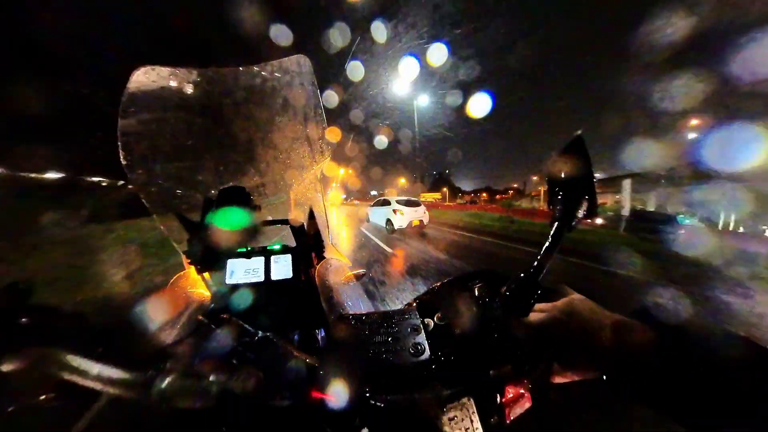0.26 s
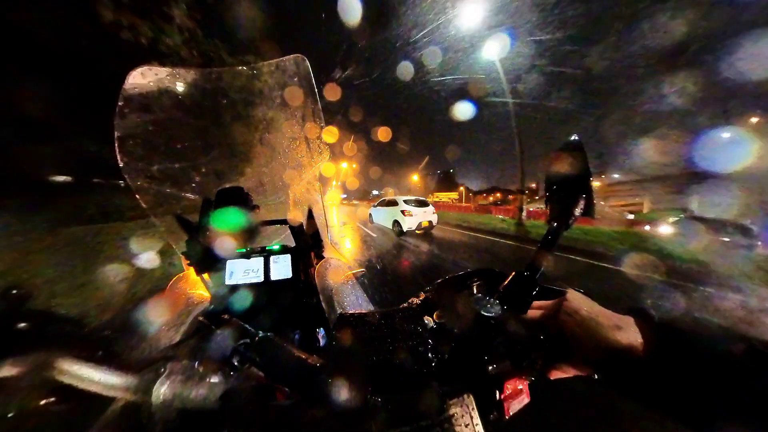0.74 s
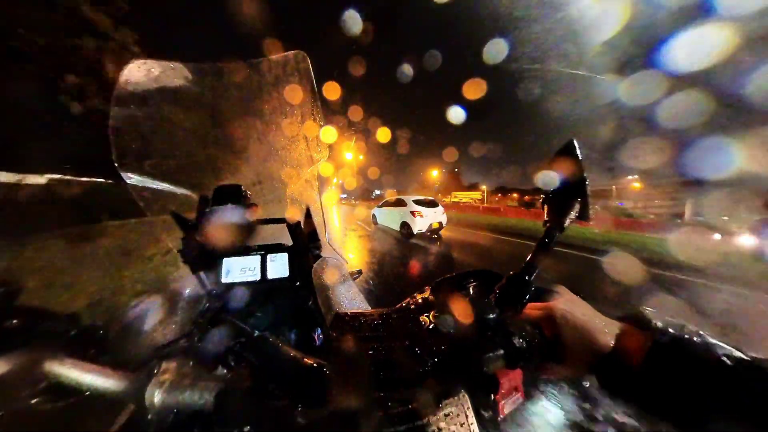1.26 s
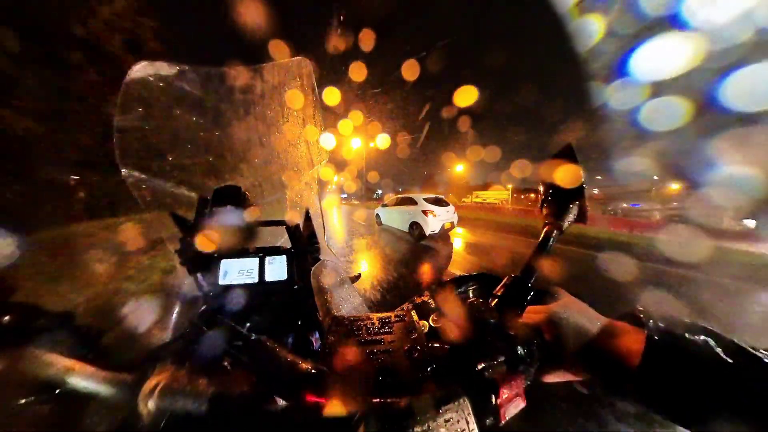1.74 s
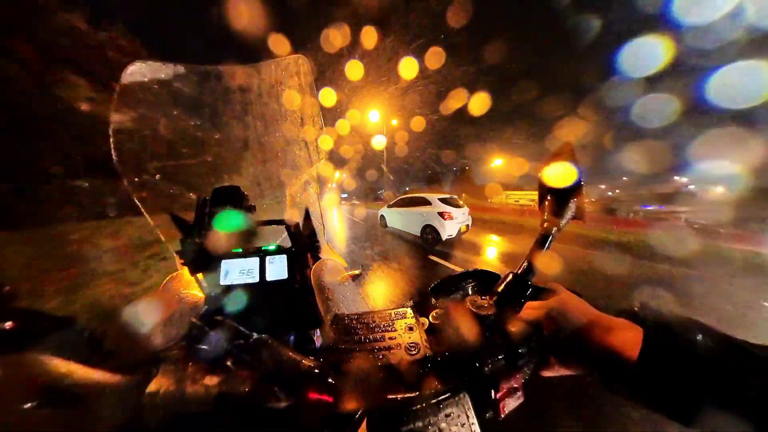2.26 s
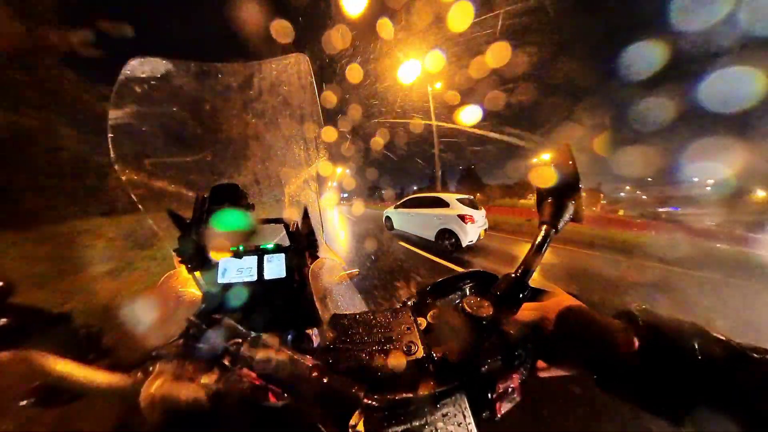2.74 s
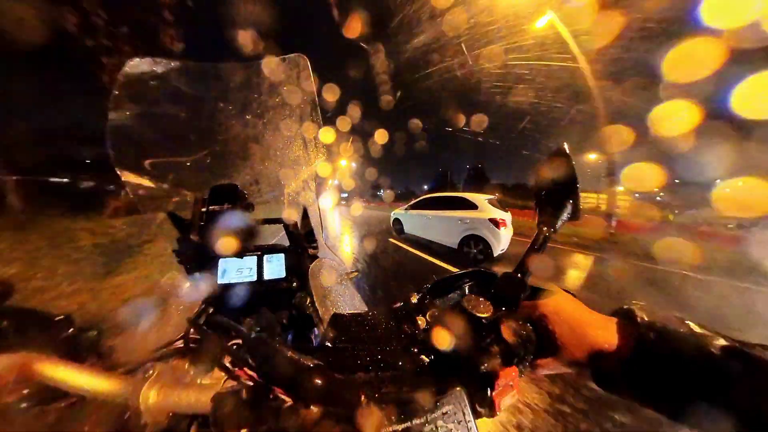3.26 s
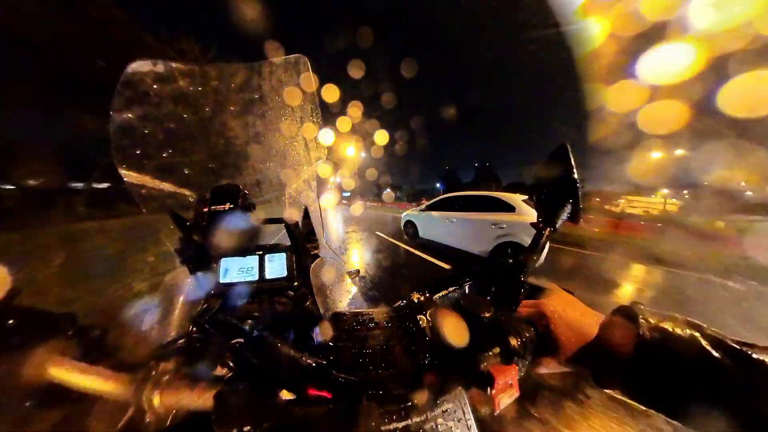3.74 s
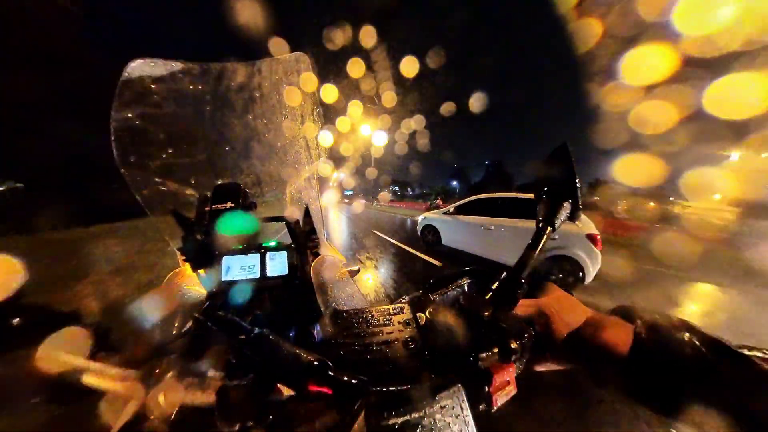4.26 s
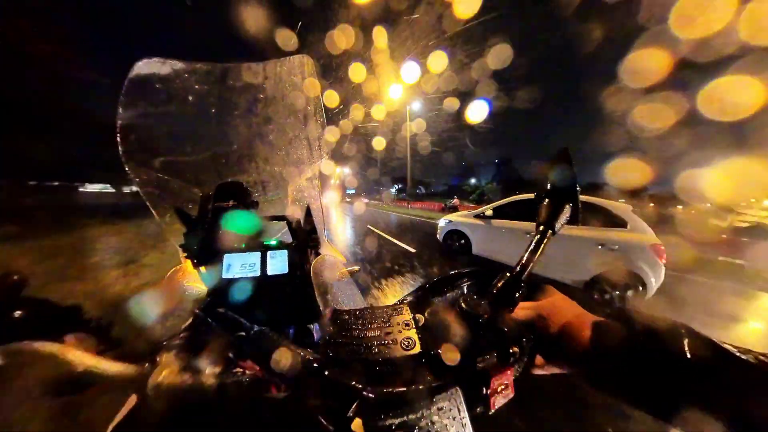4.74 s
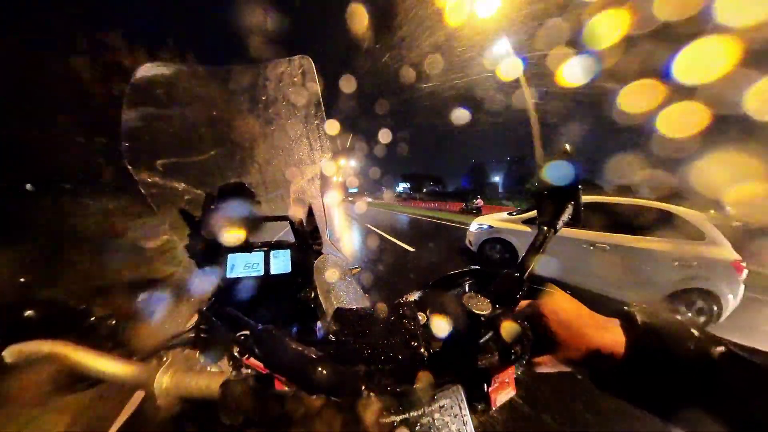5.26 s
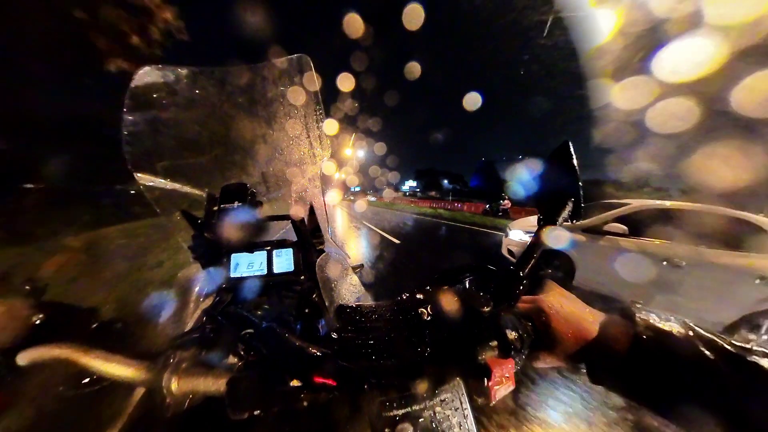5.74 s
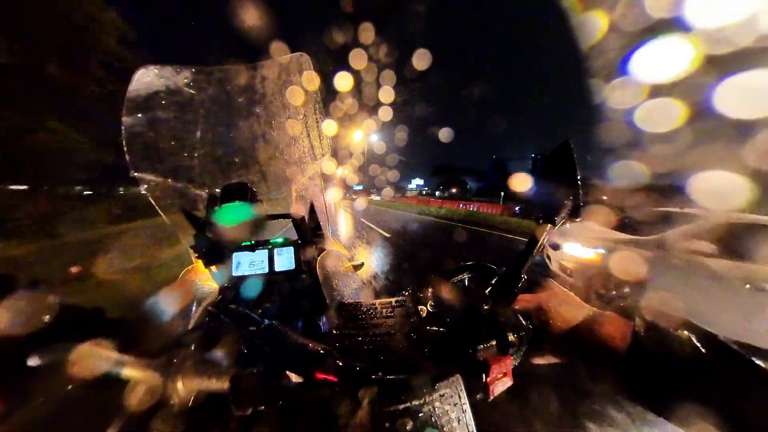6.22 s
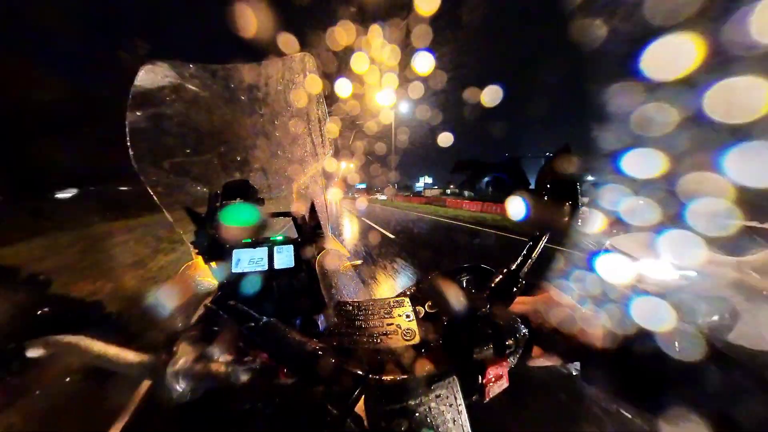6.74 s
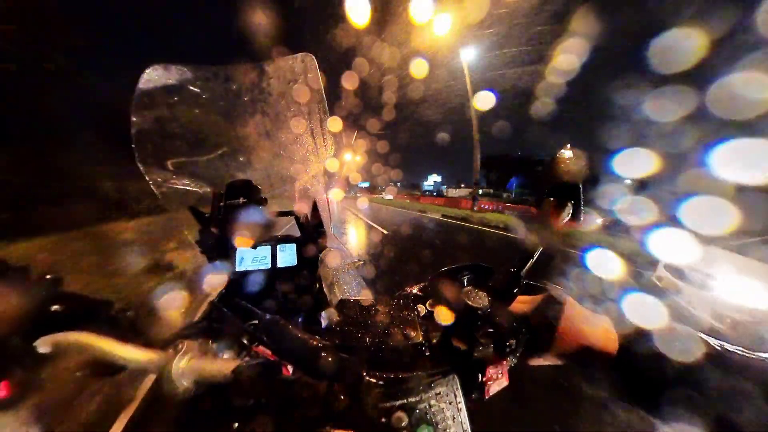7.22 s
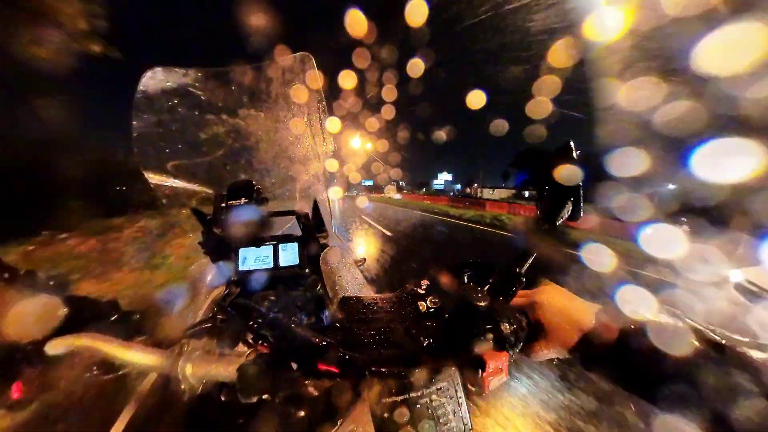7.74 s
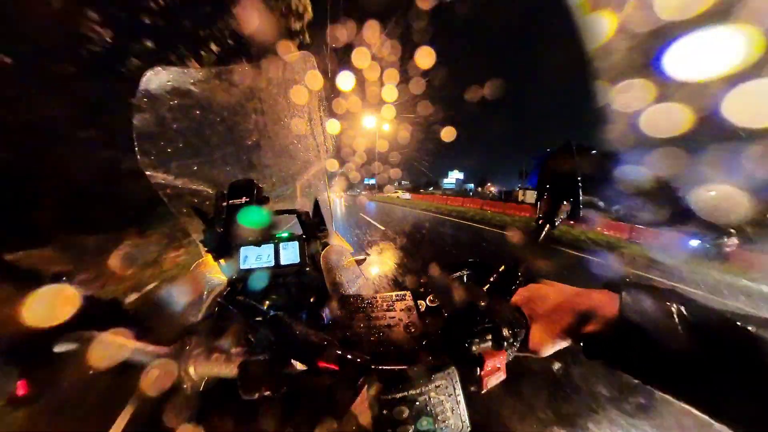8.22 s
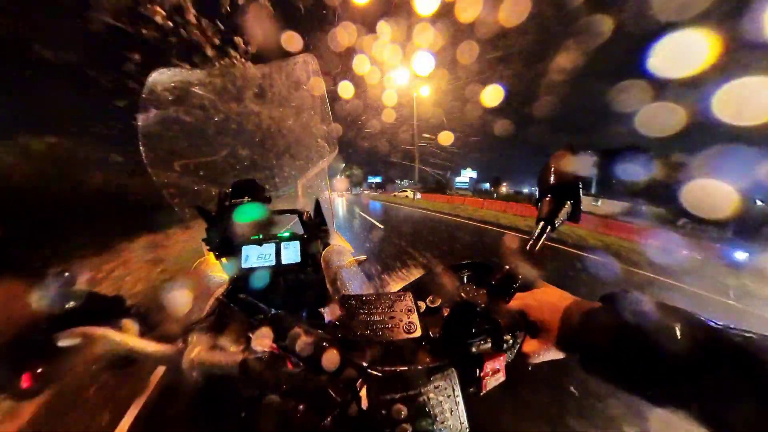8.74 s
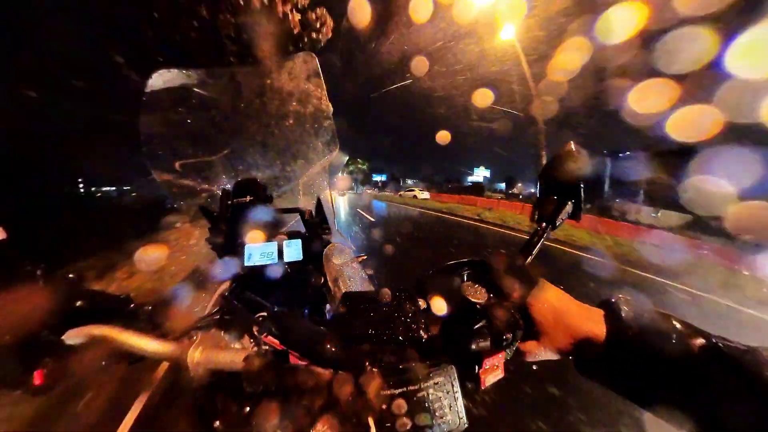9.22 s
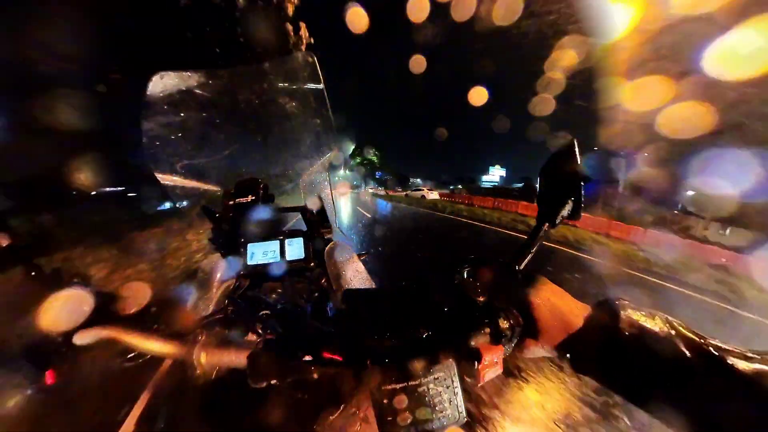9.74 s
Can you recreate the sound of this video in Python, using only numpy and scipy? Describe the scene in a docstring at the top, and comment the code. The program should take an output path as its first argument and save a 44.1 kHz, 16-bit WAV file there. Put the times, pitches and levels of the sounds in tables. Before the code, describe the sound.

Close on a moving motorcycle in heavy rain, an uneven twin-cylinder exhaust throbs under low wind buffeting and wide stereo hiss of spray. The throttle opens after a second and pitch climbs slowly. Dull knocks and wet squelches appear past four seconds. Just after six, the sound switches to muffled mono: boom, ringing clatter and ticking drops, then the throttle closes and the engine slows.

```python
"""A twin-cylinder motorcycle on a wet road in heavy rain, heard by a camera on its rider. First come the
throbbing exhaust (a stack of engine harmonics), buffeting wind and hissing rain (shaped noise). The throttle
opens after one second and the engine gathers speed; past four seconds the mount knocks and the tyre squelches.
After six seconds the camera switches from open stereo ports to one sheltered port: the hiss goes, clatter
and gear whine ring in its hollow and drops tick on the case. Last, the throttle rolls off and the engine slows."""
import sys
import numpy as np
from scipy import signal
from scipy.fft import rfft, irfft
from scipy.io import wavfile
from scipy.ndimage import uniform_filter1d, minimum_filter1d

SR = 44100
rng = np.random.default_rng(int(sys.argv[2]) if len(sys.argv) > 2 else 0)


def int16_out(signal):
    """Quantize to a 16-bit WAV file."""
    q = np.round(np.clip(np.atleast_2d(signal).T, -1, 1) * 32767)
    wavfile.write(sys.argv[1], SR, q.astype(np.int16))


N = 440118
T = np.arange(N) / SR  # time of every sample [s]
FREQ = np.maximum(np.arange(N // 2 + 1) * SR / N, 1)  # frequency of every spectrum bin [Hz]
MID_SPEED = 20.5  # reference engine speed [four-stroke cycles per second]


def undb(db):
    """Turn decibels into a gain."""
    return 10 ** (np.asarray(db) / 20)


def curve(table, axis=1):
    """Read one column of a time table at every sample."""
    table = np.array(table)
    return np.interp(T, table[:, 0], table[:, axis])


def bumps(table):
    """Smooth brief changes of level [dB]."""
    return sum(db * np.exp(-((T - s) / length) ** 2) for s, length, db in table)


def unit(x):
    """Scale to rms 1."""
    return x / np.sqrt(np.mean(x ** 2))


def noise():
    """White noise."""
    return rng.standard_normal(N)


def walk(rate):
    """Smooth random wandering, spread near 1, with rate new values per second."""
    knots = np.arange(0, T[-1] + 1, 1 / rate)
    return np.interp(T, knots, rng.standard_normal(len(knots)))


def colour(x, spectrum, modes=()):
    """Give white noise of rms 1 a spectrum in dB per Hz, with resonances on top."""
    hz, db = np.transpose(spectrum)
    gain = undb(np.interp(np.log(FREQ), np.log(hz), db)) * np.sqrt(SR / 2)
    for centre, width, boost in modes:
        peak = 1 / (1 + (2 * (FREQ - centre) / width) ** 2)
        gain = gain * (1 + (undb(boost) - 1) * peak)
    return irfft(rfft(x) * gain, N)


def ports(make, likeness, pan_db):
    """Left and right signals that share a part of their sound; pan_db is left minus right."""
    share = np.clip(likeness, 0, 1)
    common = np.sqrt(share) * make()
    separate = np.sqrt(1 - share) * np.array([make(), make()])
    sides = undb(np.array([[pan_db], [-pan_db]]) / 2)
    return unit((common + separate) * sides)


def left_late(pair, lag_s):
    """Sound from the right reaches the left port later."""
    return np.array([np.interp(T - lag_s, T, pair[0]), pair[1]])


def by_speed(speed, mid_db, slope_db):
    """Gain that follows engine speed: level at MID_SPEED, and dB more per extra cycle per second."""
    return undb(mid_db + slope_db * (speed - MID_SPEED))


def by_throttle(throttle, levels_db):
    """Gain that moves between three levels: overrun (engine braking), cruising and pulling."""
    return undb(np.interp(throttle, [-1, 0, 1], levels_db))


def harmonic(turns, db):
    """One exhaust harmonic, a sine whose level wavers slightly."""
    return np.sqrt(2) * undb(db + .7 * walk(9)) * np.sin(2 * np.pi * turns)


def boom_line(cycle, order, db, lag, smear):
    """One low exhaust harmonic; higher orders arrive later, which spreads the thump over the cycle."""
    # lag: delay in cycles; smear: further delay for each order in cycles
    return harmonic(order * (cycle - lag) - smear * order ** 2 / 2, db)


def growl_lines(cycle, speed, spectrum, level_db, tilt_db=0):
    """Upper harmonics: uneven firings add or cancel, and pipe echoes scatter their timing."""
    second_firing = 270 / 720  # the second cylinder fires 270 crank degrees after the first
    second_gain = undb(-0.5)  # and a little weaker
    orders = np.arange(13, 30)
    pair = abs(1 + second_gain * np.exp(-2j * np.pi * orders * second_firing)) / 2
    lines = []
    for order, both, lag in zip(orders, pair, rng.random(len(orders))):
        db = np.interp(order * speed, *np.transpose(spectrum)) + level_db
        db = db + tilt_db * np.log2(order / orders[0])  # dB per octave above the lowest
        lines.append((order, both * harmonic(order * cycle - lag, db)))
    return lines


def open_exhaust(cycle, speed, throttle):
    """Boom follows the throttle and fades in the silencer's dips; growl grows with speed and throttle."""
    # boom before the silencer: (order of the cycle, cruising [dB], pulling [dB])
    boom_orders = [(2, -30.5, -29.5), (3, -24.5, -23.5), (4, -16.5, -21.5), (5, -17.5, -15.5),
                   (6, -17.5, -15), (7, -20, -28.5), (8, -39, -43), (9, -23.5, -29), (10, -38.5, -19.5),
                   (11, -29, -18)]
    # dips of the silencer: (frequency [Hz], width [Hz], level [dB])
    silencer = [(136.1, 12.8, -15), (242, 6.2, -7.5)]
    # growl where both firings add up, at MID_SPEED before its gain: (frequency [Hz], one harmonic [dB])
    growl = [(255, -29), (285, -27.5), (305, -27.5), (325, -25.5), (355, -23.5), (385, -24.5), (445, -29.5),
             (480, -37), (515, -35), (640, -45)]
    # balance of the exhaust: (frequency [Hz], left minus right [dB])
    exhaust_pan = [(55, 0.5), (80, -13.5), (102, 3), (180, 2.5), (205, -7.5), (320, 4), (560, 9)]
    # brief dips under the strongest gust: (time [s], half length [s], level [dB])
    exhaust_dips = [(6.15, .06, -4)]

    axis_hz = np.arange(800.)
    response_db = sum(db * np.exp(-((axis_hz - hz) / width) ** 2) for hz, width, db in silencer)
    boom_gain = by_speed(speed, mid_db=0.71, slope_db=-0.66)
    lines = []
    for order, cruise_db, pull_db in boom_orders:
        db = cruise_db + (pull_db - cruise_db) * throttle
        db = db + np.interp(order * speed, axis_hz, response_db)
        lines.append((order, boom_gain * boom_line(cycle, order, db, lag=.8, smear=.125)))

    growl_db = -0.71 + 0.38 * (speed - MID_SPEED)
    tilt_db = -3.5 * (1 - np.clip(throttle, 0, 1))  # duller off the throttle
    lines += growl_lines(cycle, speed, growl, growl_db, tilt_db)

    out = np.zeros((2, N))
    for order, line in lines:
        pan_db = np.interp(order * speed.mean(), *np.transpose(exhaust_pan))
        sides = undb(pan_db * np.array([[.5], [-.5]]))
        out += sides / sides.mean() * line
    return left_late(out, lag_s=0.00026) * undb(bumps(exhaust_dips))


def clatter(cycle, repeat, once, twice, flutter_db, size=2048):
    """Valve and piston noise: part repeats every cycle, and it swells with each cycle and crank turn."""
    share = np.clip(repeat, 0, 1)
    pattern = np.interp(cycle % 1 * size, np.arange(size), rng.standard_normal(size))
    beat = 1 + once * np.cos(2 * np.pi * cycle) + twice * np.cos(4 * np.pi * cycle)
    mix = np.sqrt(share) * pattern + np.sqrt(1 - share) * noise()
    return unit(mix * beat * undb(flutter_db * walk(22)))


def open_clatter(cycle):
    """Engine clatter at the open ports, nearly alike on both sides, with a slowly changing level."""
    # spectrum before the swell: (frequency [Hz], level [dB per Hz])
    clatter_spectrum = [(300, -51), (560, -56), (690, -64), (860, -57), (970, -63), (1080, -56.5),
                        (1280, -77.5), (2500, -96), (6000, -118.5)]
    # slow change of level: (time [s], level [dB])
    clatter_swell = [(0, 4), (.5, 0.5), (1.3, -2.5), (2.3, 1.5), (5.2, -2), (6.2, 1.5)]

    def one_side():
        return clatter(cycle, repeat=0.25, once=0.18, twice=0.099, flutter_db=2.0)

    pair = ports(one_side, likeness=0.87, pan_db=3.5)
    return colour(pair, clatter_spectrum) * undb(curve(clatter_swell))


def gear_whine(cycle, number):
    """One harmonic of the tooth mesh, rms near 1; uneven crank speed gives it faint sidebands."""
    mesh_order = 27.26  # gear teeth that mesh in one engine cycle
    mesh = 2 * np.pi * number * mesh_order * cycle
    mesh = mesh + 0.25 * np.sin(2 * np.pi * cycle) + 0.13 * walk(25)
    return np.sqrt(2) * undb(1.1 * walk(25)) * np.sin(mesh)


def chain_hum(cycle):
    """The drive chain hums as its links meet the sprocket, rms near 1."""
    chain_order = 14.27  # chain links met in one engine cycle
    return np.sqrt(2) * undb(2.0 * walk(16)) * np.sin(2 * np.pi * chain_order * cycle)


def open_wind(speed):
    """Wind buffets the open ports: low noise with random flutter, gusts, and more level with speed."""
    # spectrum at MID_SPEED before its gain and gusts: (frequency [Hz], level [dB per Hz])
    wind_spectrum = [(15, -70), (26, -50), (35, -40), (58, -36), (105, -38), (155, -43.5), (212, -39.5),
                     (270, -46.5), (390, -49.5), (570, -55), (700, -59), (1100, -62), (1400, -72),
                     (2500, -92)]
    # gusts: (time [s], half length [s], level [dB])
    gusts = [(1.42, .14, 4.5), (3.1, .1, 3), (4.42, .07, 4.5), (6.16, 0.076, 6)]
    buffeting = unit(undb(2.3 * walk(18) + 0.64 * walk(2.7)))
    wind = colour(ports(noise, likeness=0.11, pan_db=1.5) * buffeting, wind_spectrum)
    return wind * by_speed(speed, mid_db=-0.12, slope_db=0.22) * undb(bumps(gusts))


def howl():
    """Wind sounds one low, unsteady note in a hollow near the camera, rms 1."""
    turn = 2 * np.pi * 213.1 * T  # pitch in Hz
    return unit(walk(6) * np.cos(turn) + walk(6) * np.sin(turn))


def patter(rate, spread_db):
    """Impacts of drops: many small, a few large."""
    hits = rng.random(N) < rate / SR
    size_db = spread_db * np.minimum(rng.exponential(size=N), 5)
    return unit(hits * np.sign(noise()) * undb(size_db))


def spurts(rate, decay_s, spread_db):
    """Envelope of overlapping splashes, each sudden and then dying away, rms 1."""
    fade = np.exp(-1 / (decay_s * SR))
    power = signal.lfilter([1], [1, -fade], patter(rate, spread_db) ** 2)
    return unit(np.sqrt(power + 1e-12))


def rain(cycle, speed):
    """Tyre spray hisses and throbs slightly at the engine's beat; drops splash on screen and helmet."""
    # spectrum before the level changes: (frequency [Hz], level [dB per Hz])
    rain_spectrum = [(500, -74.5), (1000, -69), (1800, -67), (2500, -68), (4000, -72), (5800, -72.5),
                     (7000, -78), (8000, -93), (8800, -105)]
    # the spray moves to the right as a car is overtaken: (time [s], lag of the left port [s])
    spray_lag = [(2, .000075), (3.5, .000136)]
    # surges of spray: (time [s], half length [s], level [dB])
    spray_surges = [(.1, 0.29, 1.5), (.74, 0.056, 1.5), (1.95, 0.2, 1.1), (2.26, .03, 2), (2.95, 0.2, 1.2),
                    (4.497, 0.0087, 4), (5.6, 0.2, 0.7), (5.95, 0.12, 1)]
    # brief dips of the hiss: (time [s], half length [s], level [dB])
    hiss_dips = [(1.16, 0.073, -3), (1.5, 0.064, -2.5), (2.34, 0.03, -4.5), (4.37, 0.054, -2.5),
                 (5.01, 0.054, -3.5), (5.15, .035, -7), (5.29, .03, -6), (6.12, .04, -4.5)]

    spray = left_late(ports(noise, likeness=.3, pan_db=4.5), lag_s=curve(spray_lag))
    spray = spray * undb(1.0 * walk(170))  # fine grain

    def splashes():
        return noise() * spurts(rate=700, decay_s=.001, spread_db=2.5)

    drops = ports(splashes, likeness=0.11, pan_db=2.5)
    throb_db = .5 * np.cos(2 * np.pi * cycle)
    flutter_db = throb_db + 0.2 * walk(45) + 0.75 * walk(15)
    surge = undb(flutter_db + bumps(spray_surges) + bumps(hiss_dips))
    level = by_speed(speed, mid_db=0.47, slope_db=-0.78)
    return colour(unit(spray + undb(-3.5) * drops), rain_spectrum) * surge * level


def knocks():
    """Bumps and buffets of wind jolt the camera mount: a sudden dull knock that dies quickly."""
    # knocks: (time [s], decay [s], rms level at the start [dB])
    jolts = [(4.155, 0.005, -17), (4.372, .007, -18), (4.402, .016, -18), (5.363, .005, -16),
             (6.115, .008, -20), (6.139, .012, -13), (6.181, .012, -15), (8.459, .014, -19)]
    # tone of a knock, scaled to rms 1 below: (frequency [Hz], relative level [dB per Hz])
    knock_spectrum = [(150, -8), (420, 1.5), (620, -0.5), (900, -6.5), (1500, -28), (3000, -60),
                      (6000, -84)]
    envelope = sum(undb(db) * (T >= s) * np.exp(-abs(T - s) / decay) for s, decay, db in jolts)
    shake = ports(noise, likeness=0.69, pan_db=1)
    return colour(envelope * shake, knock_spectrum) / np.std(colour(shake, knock_spectrum))


def squelches():
    """Water squeezed from under the tyre: short, rough, falling chirps."""
    # squelches: (time [s], length [s], starting pitch [Hz], peak before roughening [dB])
    chirps = [(4.412, .028, 1170, -22), (4.462, .034, 1250, -26), (5.992, .024, 1130, -26)]
    pitch_fall = .52  # final pitch over starting pitch
    out = np.zeros(N)
    for s, length, hz, db in chirps:
        along = np.clip((T - s) / length, 0, 1)
        swell = np.sqrt(np.sin(np.pi * along).clip(0))
        turns = np.cumsum(hz * pitch_fall ** along) / SR
        out += undb(db) * swell * np.sin(2 * np.pi * turns)
    return out * undb(2.5 * walk(400))  # rough level


def open_ports(cycle, speed, throttle):
    """Exhaust, clatter, gears, chain, wind, rain, knocks and squelches in stereo."""
    whine = gear_whine(cycle, number=1) * by_speed(speed, mid_db=-37, slope_db=2)
    chain = chain_hum(cycle) * by_speed(speed, mid_db=-34.5, slope_db=.5)
    bike = open_exhaust(cycle, speed, throttle) + open_clatter(cycle) + whine + chain
    air = open_wind(speed) + undb(-30.5) * howl()
    water = rain(cycle, speed) + squelches()
    return left_late(bike, lag_s=0.000087) + air + water + knocks()


def sheltered_exhaust(cycle, speed, throttle):
    """A duller boom that changes with the throttle; the growl dies down as the throttle closes."""
    # boom before the swell and gain: (order of the cycle, overrun [dB], cruising [dB], pulling [dB])
    boom_orders = [(2, -29, -31, -31), (3, -19.5, -14.5, -20), (4, -13.5, -25, -23.5), (5, -30, -35, -24.5),
                   (6, -23.5, -24, -27.5), (7, -31, -33, -24), (8, -32, -30, -29), (9, -31, -13.5, -18.5),
                   (10, -20, -34, -18), (11, -17.5, -28.5, -35)]
    # the upper boom, near the wind's note, swells: (time [s], half length [s], level [dB])
    boom_swell = [(6.38, .42, 4.5)]
    # growl where both firings add up, before throttle gains: (frequency [Hz], one harmonic [dB])
    growl = [(280, -29), (315, -32.5), (355, -35), (410, -44), (466, -35), (490, -44), (533, -41),
             (650, -49)]
    boom = 0
    for order, *levels_db in boom_orders:
        db = np.interp(throttle, [-1, 0, 1], levels_db)
        if order >= 9:
            db = db + bumps(boom_swell)
        boom = boom + boom_line(cycle, order, db, lag=.55, smear=.2)
    growl_db = -7 * (1 - throttle) / 2  # -7 dB on full overrun
    lines = growl_lines(cycle, speed, growl, growl_db)
    exhaust = boom + sum(line for order, line in lines)
    return exhaust * by_throttle(throttle, (0, 1, 0.1))


def sheltered_wind(throttle):
    """Wind at the sheltered port: steadier low noise with a few gusts."""
    # spectrum before the throttle gain and gusts: (frequency [Hz], level [dB per Hz])
    wind_spectrum = [(15, -72), (35, -48), (55, -38.5), (110, -41), (170, -42.5), (205, -37), (232, -38.5),
                     (258, -51), (300, -51.5), (380, -53.5), (540, -60), (720, -66), (1500, -82),
                     (4000, -125)]
    # gusts: (time [s], half length [s], level [dB])
    gusts = [(7.3, .12, 2), (7.92, .08, 2.5), (8.8, .08, 3)]
    wind = colour(unit(noise() * undb(0.61 * walk(17))), wind_spectrum)
    return wind * by_throttle(throttle, (-.8, -1.2, -1.6)) * undb(bumps(gusts))


def sheltered_clatter(cycle, throttle):
    """Engine clatter rings at the resonances of the port's hollow."""
    # spectrum before resonances, gain and swells: (frequency [Hz], level [dB per Hz])
    hollow = [(400, -60.5), (720, -63), (850, -53.5), (1000, -55), (1200, -51.5), (1300, -53), (1520, -54),
              (1700, -66.5), (2000, -84), (2450, -84.5), (2750, -94), (3200, -92), (4000, -99),
              (4300, -106), (8000, -125)]
    # resonances of the port: (frequency [Hz], width [Hz], level over the hollow [dB])
    port_modes = [(908, 62, 11), (1090, 48, 14.5), (1410, 58, 8), (1500, 24, 2)]
    # swells of the clatter: (time [s], half length [s], level [dB])
    rattle_swell = [(6.48, 0.033, 2.5), (7.02, .06, 4), (7.25, .14, 2), (7.61, 0.029, 3.5)]
    rattle = clatter(cycle, repeat=.04, once=0.15, twice=0.2, flutter_db=1.0)
    ringing = colour(rattle, hollow, port_modes)
    return ringing * by_throttle(throttle, (-.5, -1, -1)) * undb(bumps(rattle_swell))


def case_ticks():
    """Single drops splash briefly on the camera case and tick dully inside; small ones fall at random."""
    # the louder drops: (time [s], strength before the splash and its tone [dB])
    loud_drops = [(6.2433, -46), (6.2832, -47), (6.3037, -47), (6.3436, -44), (7.0126, -48), (7.3793, -49),
                  (7.5868, -48), (7.91, -50), (8.2313, -38.5), (8.343, -49), (8.7042, -37.5), (9.0774, -49),
                  (9.0938, -41), (9.1746, -46), (9.6935, -48)]
    # tone of the case: (frequency [Hz], gain density [dB per Hz])
    case_tone = [(300, -44.0), (1400, -28.5), (2400, -27.0), (4000, -40), (6000, -56), (9000, -84)]
    case_modes = [(2450, 200, 3.3)]  # (frequency [Hz], width [Hz], boost [dB])
    small_per_s, small_db, splash_s = 45, -61, .002  # rate, weakest strength [dB], decay [s]

    grit = np.sign(noise())
    chance = rng.random((round(small_per_s * T[-1]), 2))
    small = [(when * T[-1], small_db + 10 * size) for when, size in chance]
    hits = np.zeros(N)
    for s, db in list(loud_drops) + small:
        hits[int(s * SR)] += undb(db)
    splash = signal.lfilter([1], [1, -np.exp(-1 / (splash_s * SR))], hits)
    return colour(splash * grit, case_tone, case_modes)


def sheltered_port(cycle, speed, throttle):
    """Boom and wind stay; clatter rings, the second gear harmonic whines and drops tick on the case."""
    exhaust = sheltered_exhaust(cycle, speed, throttle)
    note = howl() * by_throttle(throttle, (-26.5, -29, -24))
    whine = gear_whine(cycle, number=2) * by_throttle(throttle, (-19, -28.5, -46))
    engine = exhaust + sheltered_clatter(cycle, throttle) + whine
    return engine + sheltered_wind(throttle) + note + case_ticks() + knocks().mean(axis=0)


def scene():
    """One engine, heard first through the open ports and then through the sheltered one."""
    # engine speed: (time [s], four-stroke cycles per second)
    speed_table = [(0.0, 19.68), (0.5, 19.19), (0.9, 19.12), (1.4, 19.37), (2.0, 19.8), (2.6, 20.14),
                   (4.4, 21.07), (5.0, 21.48), (5.9, 21.9), (7.2, 22.25), (7.7, 22.24), (8.0, 22.03),
                   (8.3, 21.53), (9.5, 20.28), (9.98, 19.9)]
    # throttle: (time [s], position: -1 overrun, 0 cruising, 1 pulling)
    throttle_table = [(1.08, 0), (1.22, .92), (7.62, 1), (7.97, .12), (8.3, -.05), (8.8, -.7)]
    switch_s, fade_s = 6.218, 0.0073  # middle and length of the switch between ports [s]
    speed, throttle = curve(speed_table), curve(throttle_table)
    cycle = np.cumsum(speed) / SR  # engine cycles so far
    sheltered = np.clip((T - switch_s) / fade_s + .5, 0, 1)
    before = (1 - sheltered) * open_ports(cycle, speed, throttle)
    return before + sheltered * sheltered_port(cycle, speed, throttle)


def record(dry):
    """The camera's look-ahead limiter holds the peaks down; a steep low-pass filter cuts the top."""
    ceiling, top_hz = .83, 8400  # limiter ceiling (full scale is 1), edge of the treble cut [Hz]
    gain = ceiling / np.maximum(abs(dry).max(axis=0), ceiling)
    gain = uniform_filter1d(minimum_filter1d(gain, size=500), size=500)
    low_pass = signal.ellip(8, .2, 70, top_hz, fs=SR, output="sos")
    return signal.sosfilt(low_pass, dry * gain)


dry = scene()
out = record(dry)
int16_out(out)
```